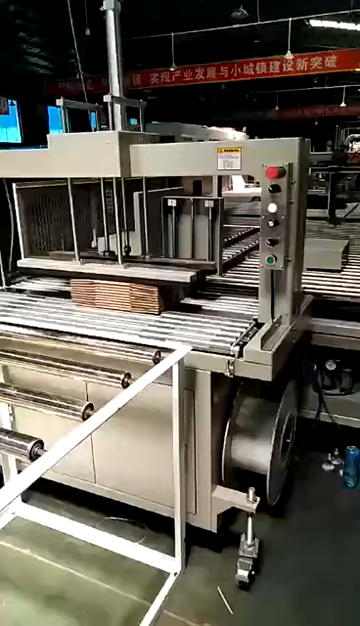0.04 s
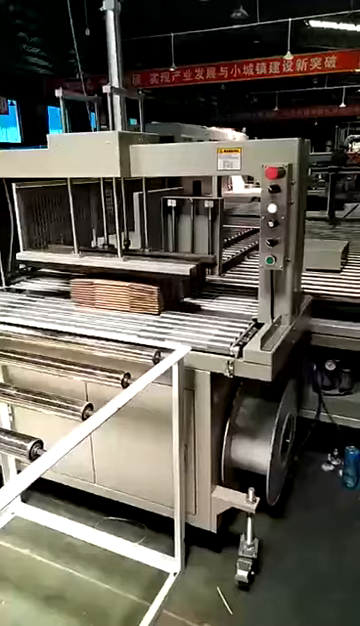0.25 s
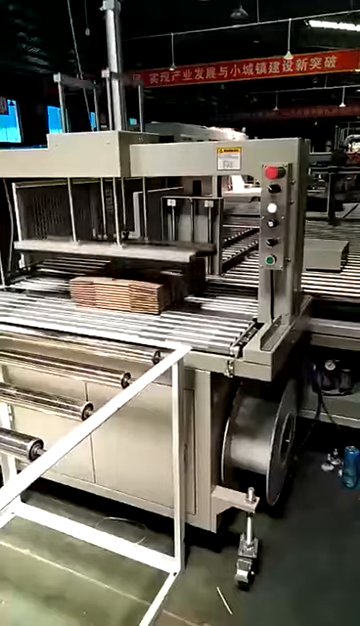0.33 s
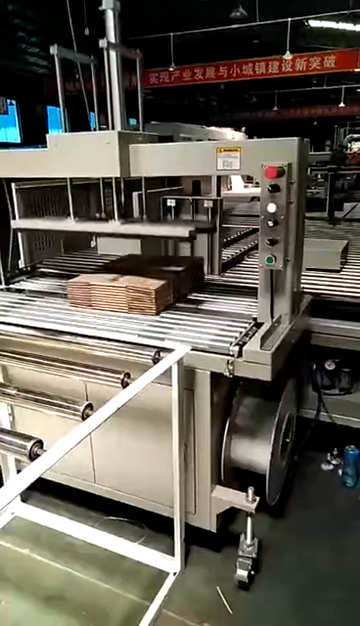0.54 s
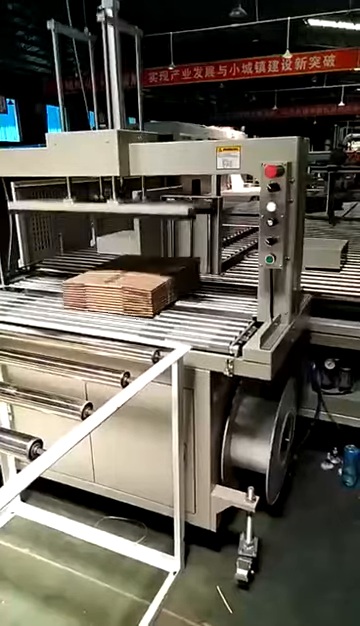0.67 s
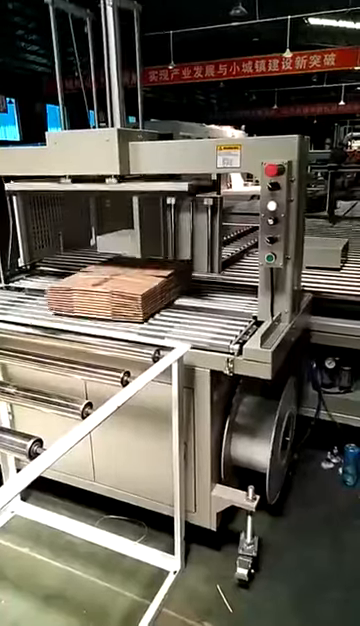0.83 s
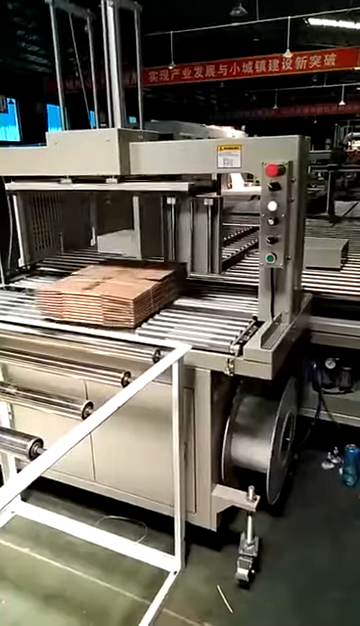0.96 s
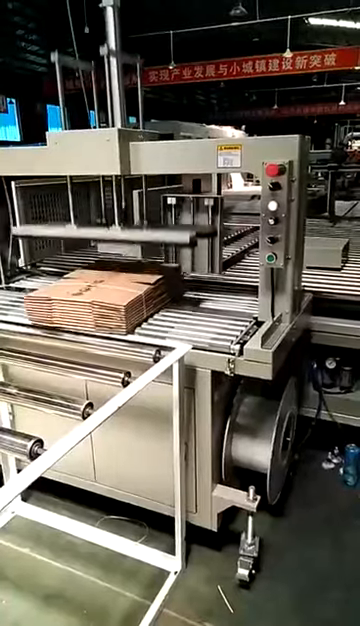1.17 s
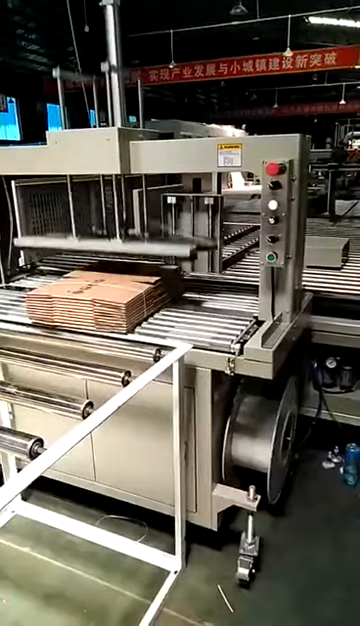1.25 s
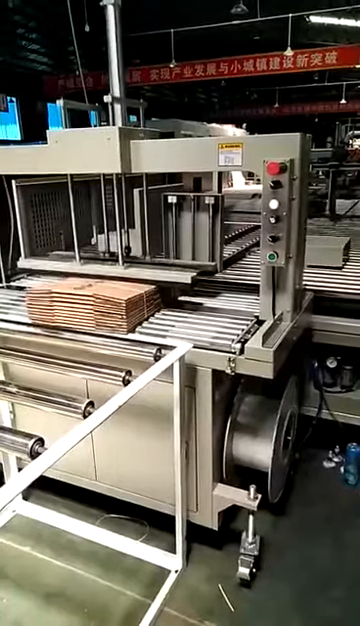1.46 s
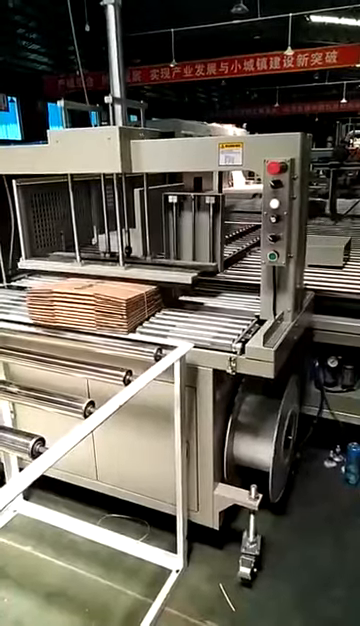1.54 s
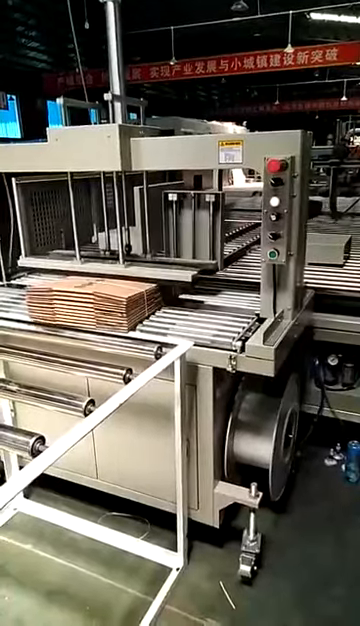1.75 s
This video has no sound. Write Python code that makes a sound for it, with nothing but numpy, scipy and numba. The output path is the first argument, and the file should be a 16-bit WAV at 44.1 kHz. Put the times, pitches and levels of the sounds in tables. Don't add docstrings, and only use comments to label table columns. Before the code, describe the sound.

Pneumatic press machine rumbles with a rising air hiss, clanks to a stop, then quiet factory drone

```python
import sys
import numpy as np
from scipy import signal
from scipy.fft import rfft, irfft
from scipy.io import wavfile
from scipy.ndimage import uniform_filter1d
from numba import njit

SR = 44100
rng = np.random.default_rng(int(sys.argv[2]) if len(sys.argv) > 2 else 0)


def dump(signal):
    limited = np.clip(np.atleast_2d(signal).T, -1, 1)
    pcm = np.round(limited * 32767).astype(np.int16)
    wavfile.write(sys.argv[1], SR, pcm)


def field_ratio(decibels):
    return 10 ** (np.asarray(decibels, dtype=float) / 20)


N = 79380

# (time [s], level [dB])
FAR_ACTIVITY = [(.09, 0), (.9, 0), (1.0, -1.5), (1.12, -0.5), (1.22, -1), (1.3, -2), (1.38, -3.5),
                (1.46, 0), (1.55, -0.5), (1.62, -3), (1.68, -1.5), (1.8, -2)]
# (frequency [Hz], level [dB])
HALL_COLOUR = [(15, -70.5), (25, -33.5), (59, -0.5), (122, -4.5), (262, -2), (367, -4), (560, -8.5),
               (800, -8.5), (1440, -13), (2010, -15), (3600, -21), (4600, -18.5), (7700, -23), (10000, -65),
               (16900, -120)]
# (time [s], length [s], level [dB], frequency [Hz])
MOTOR_HUMS = [
    (1.057, 0.12, -45, 69.9),
    (1.73, .12, -41.5, 66.3),
]
HALL_DB = -41
HALL_T60_S, HALL_ECHO_DB = .9, -17

# (time [s], length [s], level [dB], frequency [Hz])
PANEL_SONGS = [(0.89, .015, -47, 1970), (0.937, 0.017, -43, 1117), (0.964, 0.01, -45, 1550),
               (0.968, 0.057, -45.5, 1272), (0.987, 0.08, -46, 1108), (1.03, 0.042, -51, 1310),
               (1.017, 0.057, -52.5, 3085), (1.165, .012, -45.5, 1406), (1.466, 0.029, -44.5, 1615),
               (1.464, 0.044, -43, 1432), (1.459, 0.021, -45, 915), (1.508, 0.018, -41.5, 1350),
               (1.508, 0.023, -47, 1540), (1.513, .04, -46, 1044), (1.567, 0.035, -49, 1004),
               (1.601, .04, -44, 573), (1.664, 0.029, -48.5, 1155), (0.197, .008, -33, 2150),
               (0.196, 0.0054, -37.5, 2833), (0.156, 0.015, -40, 1868), (0.255, 0.014, -43, 5040),
               (1.412, .025, -46.5, 543), (1.555, 0.016, -41.5, 260)]
PANEL_WIDTH_HZ = 75

# (time [s], length [s], level [dB], centre [Hz])
RATTLES = [(.32, 0.059, -32, 1580), (0.683, 0.065, -35, 2457), (0.807, 0.14, -43.5, 1430),
           (.97, 0.095, -51, 1250), (1.459, 0.035, -41.5, 1470), (1.505, 0.026, -42, 1300),
           (1.58, 0.045, -47.5, 820), (1.1, 0.08, -50, 1920), (1.106, 0.087, -51, 700),
           (1.7, 0.02, -56, 1600), (1.232, 0.1, -49, 2040)]
RATTLE_CLICKS_PER_S, RATTLE_SPREAD_DB, RATTLE_RING_GAIN = 900, 3, .4

# (time [s], level [dB], hold [s], centre [Hz], width [Hz])
VALVE_PUFFS = [(0.201, -32.5, 0.0056, 4520, 6000), (0.206, -39, 0.1, 6400, 3970),
               (0.307, -31, 0.009, 5086, 5000), (0.481, -34, 0.0078, 5730, 602),
               (0.713, -30, 0.044, 6700, 2410), (0.786, -27, 0.01, 7280, 1000),
               (0.795, -23.5, 0.012, 5810, 2000), (0.812, -36, 0.059, 6800, 2500),
               (1.008, -46.5, 0.014, 6620, 2520), (1.043, -37, 0.013, 5440, 600),
               (1.06, -43.5, .015, 5570, 700), (1.049, -41.5, 0.037, 6850, 1610),
               (1.14, -45, 0.031, 5780, 3970), (1.248, -43, 0.023, 5070, 1500),
               (1.251, -45, 0.025, 3300, 1490), (1.237, -47.5, 0.028, 7130, 900),
               (1.308, -47.5, 0.0065, 7050, 597), (1.316, -46, 0.017, 6330, 2510),
               (1.659, -49, 0.02, 4440, 5030), (1.462, -53.5, 0.055, 4620, 2010)]
PUFF_ATTACK_S, PUFF_T60_S, PUFF_T60_PER_HOLD = .003, .05, 3

# (time [s], bar level [dB], thud level [dB], thud frequency [Hz])
BAR_KNOCKS = [(.706, -33, -22, 250), (.728, -23, -26, 130), (.740, -33, -22, 130), (.764, -21.5, -20, 120),
              (.772, -30, -24, 60), (.893, -36, -42, 260), (.945, -50, -50, 200), (1.31, -55, -24, 200),
              (1.162, -50, -33, 400), (1.612, -55, -33, 580), (1.712, -58, -32, 270),
              (1.466, -46, -42, 330), (1.505, -50, -37, 210), (1.1, -55, -38, 270), (1.433, -55, -32, 330),
              (1.535, -48, -33, 260), (1.0, -50, -45, 150), (1.04, -48, -50, 150)]
# (frequency [Hz], level [dB], time to fall 30 dB [s])
BAR_MODES = [(490, -13, .06), (880, -7, .08), (1105, -1.5, .1), (1290, -9, .1), (1480, -6, .1),
             (1790, -9, .07), (2050, -5, .08), (2380, -10, .05)]
PUSH_S = .003
FREE_RING_S, DAMPED_T60_S = .016, .04
THUD_CYCLES, THUD_MAX_S = 20, .11

# (time [s], hiss level [dB])
AIR_FLOW = [
    (0.09, -40),
    (0.166, -31),
    (0.236, -27),
    (0.652, -26.5),
    (0.774, -24.5),
    (0.786, -31),
    (0.806, -25.5),
    (0.832, -34.5),
    (0.98, -48),
]
# (frequency [Hz], level [dB])
HISS_COLOUR = [(350, -22.5), (600, 0), (800, -11.5), (900, -8), (1130, -3), (1980, -5), (3380, -12),
               (4510, -8), (7700, -9.5), (10000, -72), (16900, -120)]
# (time [s], pitch [Hz], level [dB])
CHAMBER_WHISTLE = [
    (.398, 4000, -45),
    (.414, 4600, -33),
    (.434, 5650, -28),
    (.446, 6050, -44),
    (.5, 6950, -39),
    (.56, 7450, -38),
    (.66, 7560, -38),
    (.7, 7560, -55),
]
HISS_FLICKER_DB = 1.2
VALVE_OPENS_S, HALF_OPEN_DB = 0.22, -5.5
WHISTLE_WIDTH_HZ, WHISTLE_RAGGED_DB = 480, 1.2
SWALLOW_RATIO, SWALLOW_WIDTH_HZ = 1.24, 1300

# (time [s], rumble level [dB])
DRIVE_LOAD = [
    (.09, -46),
    (.17, -33.5),
    (.24, -35.5),
    (.31, -25),
    (.42, -24),
    (.48, -27.5),
    (.7, -25.5),
    (.78, -36),
    (.83, -49),
]
# (frequency [Hz], level [dB])
DRIVE_COLOUR = [(15, -51), (25, -10.5), (82, -2), (144, -1.5), (413, -1.5), (609, -7.5), (798, -34.5),
                (900, -7.5), (1170, -41), (1980, -120)]
# (frequency [Hz], width [Hz], level [dB])
CONVEYOR_MODES = [(96, 45, -15.5), (155, 50, -18), (252.2, 30.6, -15), (351, 18, -22), (417, 34, -16),
                  (594, 4.1, -20)]
# (time [s], peak level [dB], frame frequency [Hz])
ROLLER_LURCHES = [(.315, -23.5, 280), (0.371, -23.5, 100), (0.409, -23.5, 119.6), (.42, -28.5, 200),
                  (0.446, -24.5, 230), (0.463, -26.5, 60), (0.483, -26, 109), (.505, -25, 165),
                  (.53, -23.5, 240), (.585, -25, 141), (.64, -26.5, 169.5), (.69, -26.5, 238)]
ROLLER_BUMPS_PER_S, BUMP_SPREAD_DB, BUMP_DB = 700, 2, -3
LURCH_T60_S = 0.16

# (time [s], low edge [Hz], high edge [Hz], level [dB])
STRAY_BANDS = [
    (.255, 4150, 5800, -40),
    (.348, 5150, 6400, -40),
    (.929, 6250, 7700, -50),
    (1.161, 4150, 5300, -53),
    (1.625, 5150, 6400, -62),
    (1.648, 4150, 5300, -60),
]
STRAY_S = 0.026
START_S, FADE_FROM_DB, FADE_S = 0.084, -9.5, 0.095
CASING_NOTCH_HZ, CASING_WIDTH_HZ, CASING_DEPTH = 3716, 250, 0.31
FLUTTER_DB, FLUTTER_FROM_HZ = 2, 1500
TOP_HZ = 7700


def level(x, db):
    return x * field_ratio(db) / np.sqrt(np.mean(x ** 2) + 1e-30)


def read(table, column=1):
    return np.interp(np.arange(N) / SR, [r[0] for r in table], [r[column] for r in table])


def colour(x, table):
    hz, db = np.array(table).T
    log_f = np.log(np.maximum(np.arange(N // 2 + 1) * SR / N, 1))
    log_hz = np.log(np.r_[hz[0] / 2, hz, hz[-1] * 2])
    gain_db = np.interp(log_f, log_hz, np.r_[db[0] - 30, db, db[-1] - 30])
    return level(irfft(rfft(x) * field_ratio(gain_db), N), 0)


@njit
def svf(x, hz, width):
    y, b, l = np.empty(len(x)), 0., 0.
    for i in range(len(x)):
        g, k = np.tan(np.pi * hz[i] / SR), width / hz[i]
        v = (b + g * (x[i] - l)) / (1 + g * (g + k))
        b, l, y[i] = 2 * v - b, l + 2 * g * v, k * v
    return y


def band(x, hz, width):
    hz = np.clip(hz * np.ones(N), 20, SR / 3)
    once = svf(x, hz, 1. * width)
    return level(svf(once, hz, 1. * width), 0)


def air(hz, width):
    return band(rng.standard_normal(N), hz, width)


def steady(x, size):
    return x / np.sqrt(uniform_filter1d(x ** 2, size=size) + 1e-9)


def walk(rate):
    k = int(SR / rate)
    steps = np.repeat(rng.standard_normal(N // k + 1), k)
    w = uniform_filter1d(uniform_filter1d(steps, k), k)[:N]
    return w / w.std()


def clicks(per_s, spread_db):
    when, sign, size = rng.random((3, N))
    return (when < per_s / SR) * np.sign(sign - .5) * field_ratio(-spread_db * np.log(1 - size))


def shape(start, attack, hold, t60):
    t = np.arange(N) / SR - start
    return np.clip(t / attack, 0, 1) * field_ratio(-60 * np.clip(t - attack - hold, 0, None) / t60)


def ring(start, hz, t60, phase):
    t = np.clip(np.arange(N) / SR - start, 0, None)
    return np.minimum(t / PUSH_S, 1) * field_ratio(-60 * t / t60) * np.sin(2 * np.pi * hz * t + phase)


def hall():
    swell, t = read(FAR_ACTIVITY), np.arange(N) / SR
    drone = 0
    for hz in 30 * 2. ** np.arange(0, 8.5, .5):
        drone = drone + air(hz, hz * 0.69) * np.sqrt(hz) * field_ratio(swell + 2.3 * walk(11.91))
    hums = sum(field_ratio(db) * shape(s, 0.04, length, 0.26) * np.sin(2 * np.pi * hz * t)
               for s, length, db, hz in MOTOR_HUMS)
    return field_ratio(HALL_DB) * colour(drone, HALL_COLOUR) + hums


def hall_echo(near):
    t = np.arange(SR) / SR
    tail = rng.standard_normal(SR) * field_ratio(-60 * t / HALL_T60_S) * (t > .015)
    tail = tail / np.sqrt(np.sum(tail ** 2))
    return field_ratio(HALL_ECHO_DB) * signal.fftconvolve(near, tail)[:N]


def guard_panels():
    return sum(field_ratio(db) * shape(s, 0.0055, length, 0.067) * steady(air(hz, PANEL_WIDTH_HZ), size=900)
               for s, length, db, hz in PANEL_SONGS)


def frame_rattles():
    out = 0
    for s, length, db, hz in RATTLES:
        hits = clicks(RATTLE_CLICKS_PER_S, RATTLE_SPREAD_DB)
        body = band(hits, hz, hz * 0.92)
        for mode_hz, _, _ in BAR_MODES[1:]:
            nearness = field_ratio(-9 * abs(np.log2(mode_hz / hz)))
            body = body + RATTLE_RING_GAIN * band(hits, mode_hz, 68) * nearness
        out = out + level(body, db) * shape(s, 0.0098, length, 0.16)
    return out


def valves():
    out = 0
    for s, db, hold, hz, width in VALVE_PUFFS:
        puff = shape(s, PUFF_ATTACK_S, hold, PUFF_T60_S + PUFF_T60_PER_HOLD * hold)
        out = out + field_ratio(db) * puff * air(hz, width)
    return out


def press_bar():
    out, chance = 0, rng.standard_normal((len(BAR_KNOCKS), len(BAR_MODES), 3))
    for (s, db, thud_db, thud_hz), draws in zip(BAR_KNOCKS, chance):
        bar = sum(field_ratio(mode_db + 0.76 * a) * ring(s, hz * (1 + 0.0067 * b), 2 * t60, 3 * p)
                  for (hz, mode_db, t60), (a, b, p) in zip(BAR_MODES, draws))
        bar = bar * shape(s, PUSH_S, FREE_RING_S, DAMPED_T60_S)
        thud = ring(s, thud_hz, min(THUD_CYCLES / thud_hz, THUD_MAX_S), 0)
        out = out + field_ratio(db) * bar + field_ratio(thud_db) * thud
    return out


def cylinder():
    half_open = np.arange(N) < VALVE_OPENS_S * SR
    hiss = 0
    for hz in 700 * 2. ** np.arange(0, 4, .5):
        gain_db = HISS_FLICKER_DB * walk(21.97) + HALF_OPEN_DB * (hz > 3000) * half_open
        hiss = hiss + air(hz, hz * 1.11) * np.sqrt(hz) * field_ratio(gain_db)
    hiss = colour(hiss, HISS_COLOUR) * field_ratio(read(AIR_FLOW) - 3.0) * shape(0, .01, 0.92, 0.22)
    whistle = steady(air(read(CHAMBER_WHISTLE), WHISTLE_WIDTH_HZ), size=400)
    whistle_db = read(CHAMBER_WHISTLE, column=2) + WHISTLE_RAGGED_DB * walk(150)
    return hiss + whistle * field_ratio(whistle_db) * shape(.39, 0.014, 0.21, .05)


def chamber_swallow(x):
    hz = np.minimum(SWALLOW_RATIO * read(CHAMBER_WHISTLE), 7900.)
    return x - shape(.405, 0.03, .055, .06) * svf(x, hz, 1. * SWALLOW_WIDTH_HZ)


def conveyor():
    bumps = level(clicks(ROLLER_BUMPS_PER_S, BUMP_SPREAD_DB), 0)
    push = field_ratio(BUMP_DB) * bumps + rng.standard_normal(N)
    body = colour(push, DRIVE_COLOUR)
    body = body + sum(field_ratio(db) * band(push, hz, width) for hz, width, db in CONVEYOR_MODES)
    load = field_ratio(read(DRIVE_LOAD) - 1.0 + 2.6 * walk(19.6))
    lurches = sum(field_ratio(db) * ring(s, hz, LURCH_T60_S, 0) for s, db, hz in ROLLER_LURCHES)
    return steady(body, size=2500) * load * shape(0, .01, 0.77, 0.43) + lurches


def scene():
    near = conveyor() + cylinder() + valves() + press_bar() + frame_rattles() + guard_panels()
    machine = chamber_swallow(near + hall_echo(near))
    return np.tile(machine + hall(), (2, 1))


def flutter(x):
    f, _, s = signal.stft(x, SR, nperseg=1024)
    g = uniform_filter1d(rng.standard_normal(s.shape), size=4, axis=0)
    g = uniform_filter1d(g, size=3, axis=1)
    gain_db = FLUTTER_DB * g / g.std() * np.clip(f / FLUTTER_FROM_HZ, 0, 1)[:, None]
    return signal.istft(s * field_ratio(gain_db), SR, nperseg=1024)[1][:N]


def stray_noise():
    f, t = np.arange(N // 2 + 1) * SR / N, np.arange(N) / SR
    out = 0
    for s, low, high, db in STRAY_BANDS:
        noise = irfft(rfft(rng.standard_normal(N)) * (f > low) * (f < high), N)
        out = out + level(noise, db) * np.clip(2 - 3 * np.abs(t - s) / STRAY_S, 0, 1)
    return out


def roll_off(x):
    return signal.sosfilt(signal.butter(12, 8540, fs=SR, output="sos"), x)


def record(dry):
    t = np.arange(N) / SR - START_S
    f = np.arange(N // 2 + 1) * SR / N
    x = dry[0] - CASING_DEPTH * svf(dry[0], np.full(N, 1. * CASING_NOTCH_HZ), 1. * CASING_WIDTH_HZ)
    x = flutter(x) * (t > 0) * field_ratio(FADE_FROM_DB * np.clip(1 - t / FADE_S, 0, 1))
    x = irfft(rfft(x) * np.clip((TOP_HZ - f) / 80, 0, 1), N)
    mix = x * (t > -.01) + stray_noise() * np.array([[1], [-1]])
    return roll_off(mix)


dry = scene()
out = record(dry)
dump(out)
```